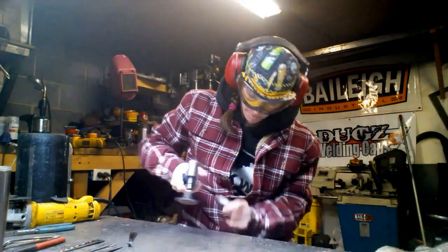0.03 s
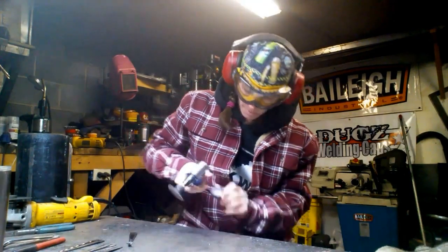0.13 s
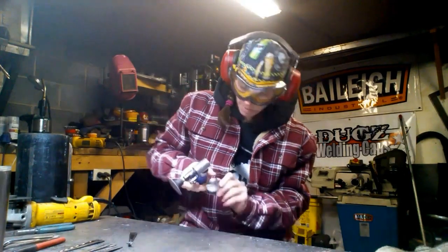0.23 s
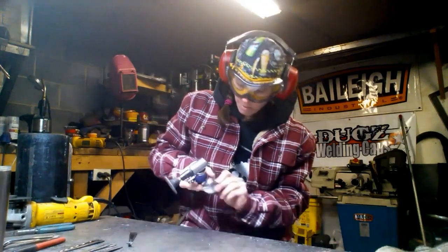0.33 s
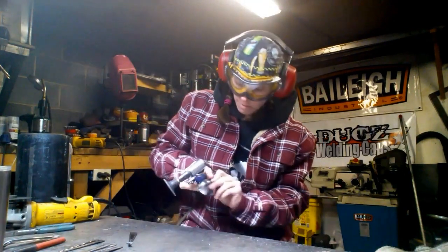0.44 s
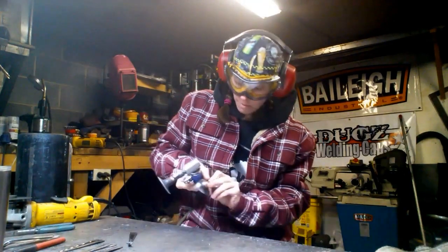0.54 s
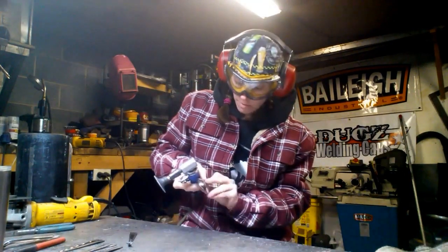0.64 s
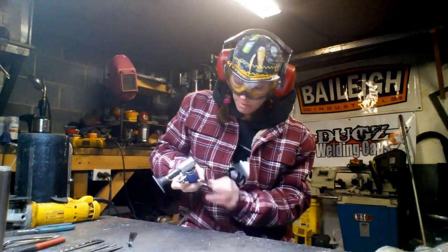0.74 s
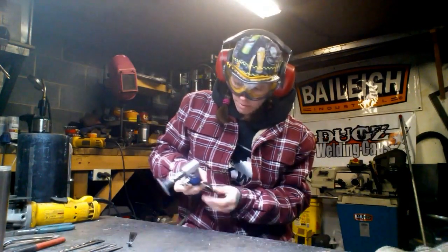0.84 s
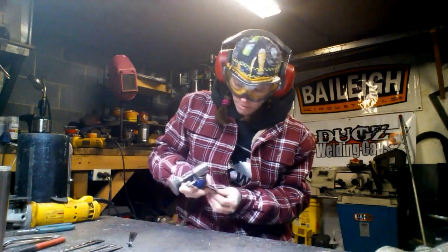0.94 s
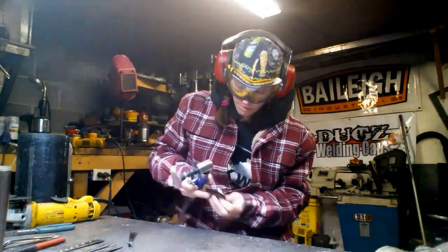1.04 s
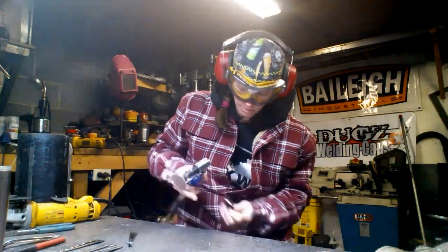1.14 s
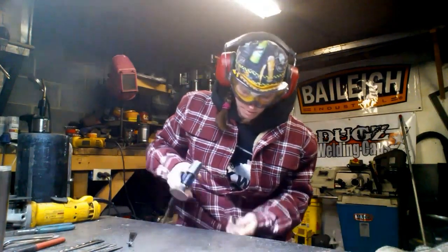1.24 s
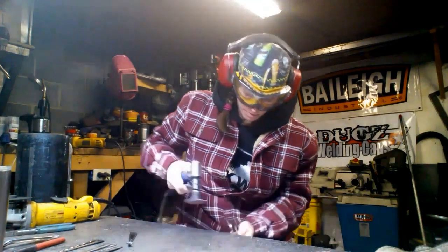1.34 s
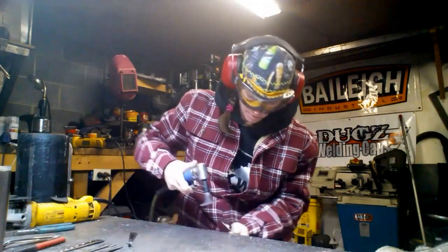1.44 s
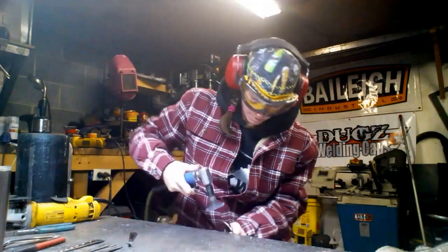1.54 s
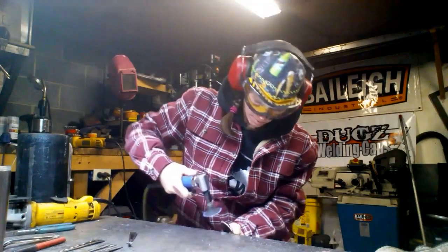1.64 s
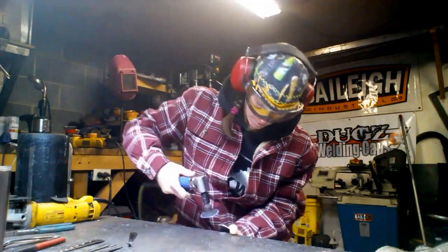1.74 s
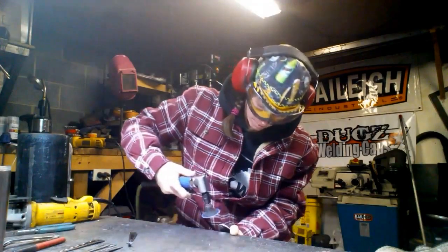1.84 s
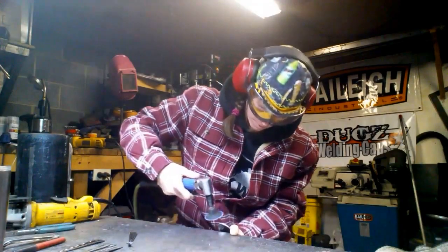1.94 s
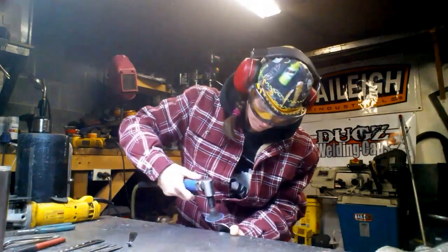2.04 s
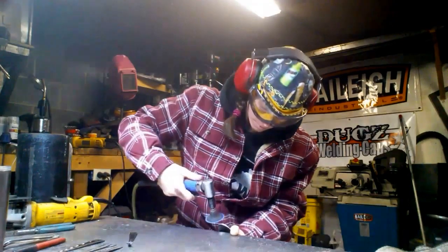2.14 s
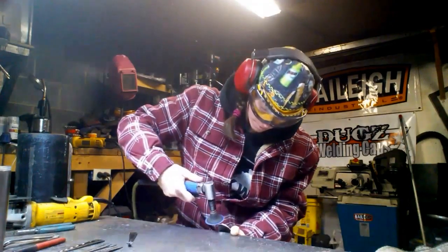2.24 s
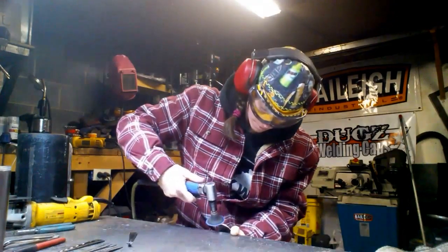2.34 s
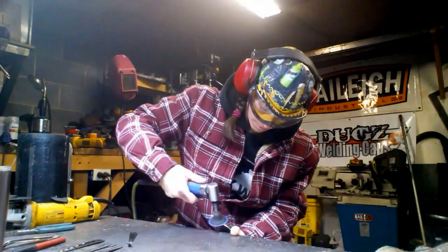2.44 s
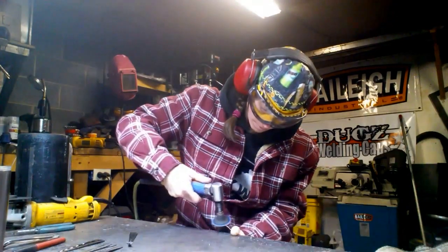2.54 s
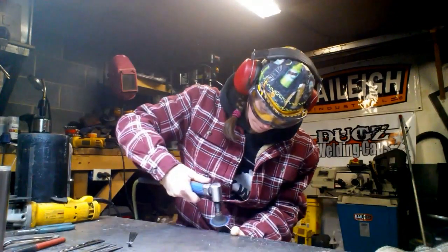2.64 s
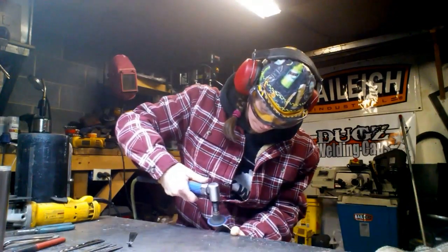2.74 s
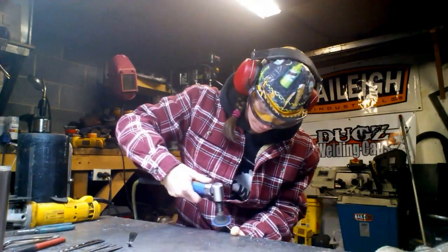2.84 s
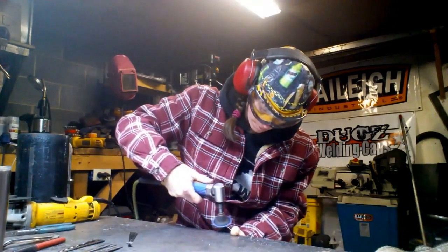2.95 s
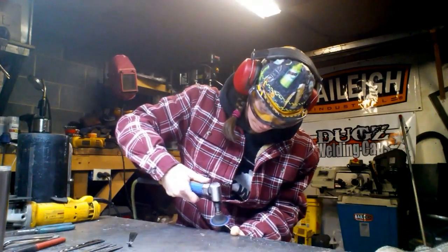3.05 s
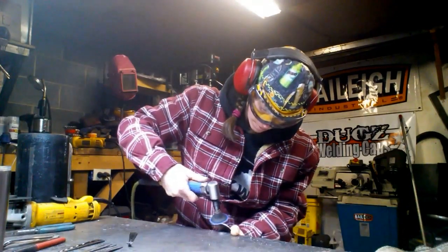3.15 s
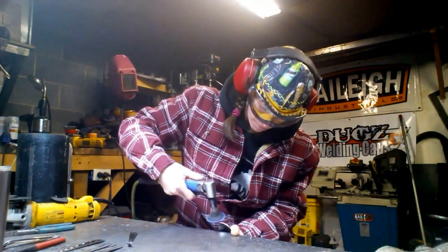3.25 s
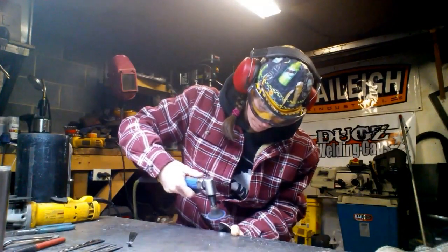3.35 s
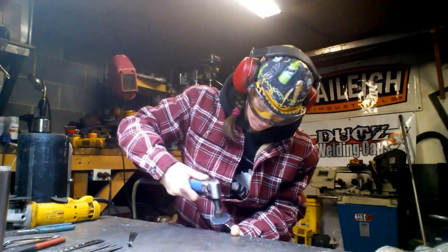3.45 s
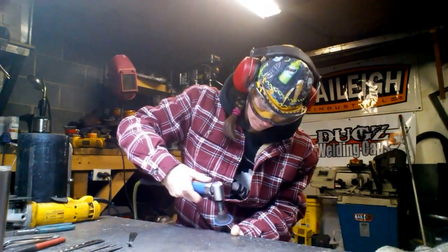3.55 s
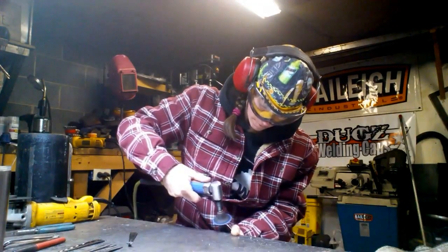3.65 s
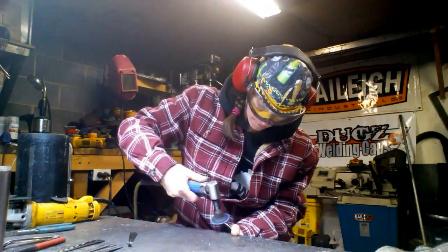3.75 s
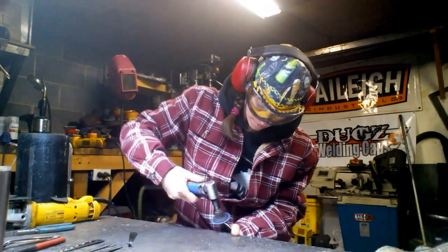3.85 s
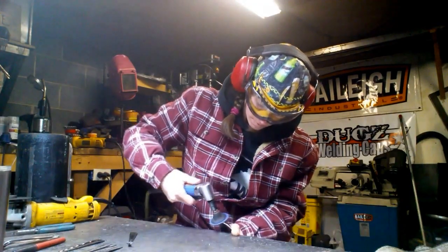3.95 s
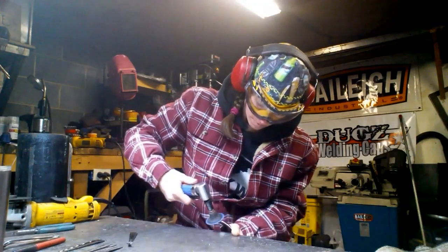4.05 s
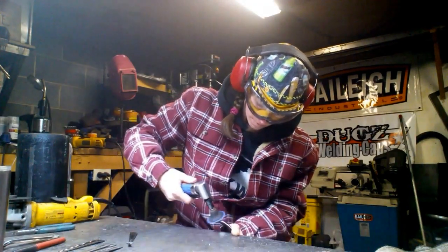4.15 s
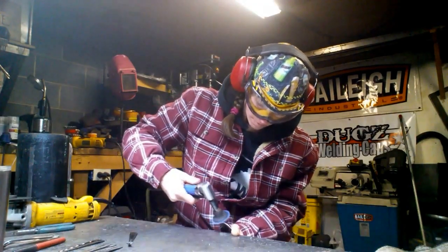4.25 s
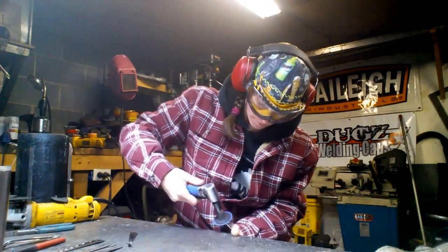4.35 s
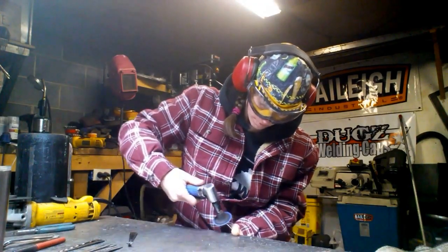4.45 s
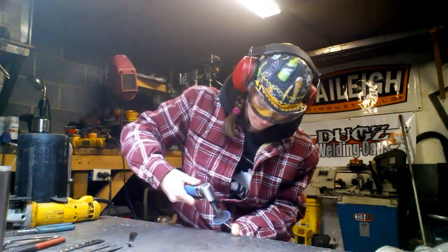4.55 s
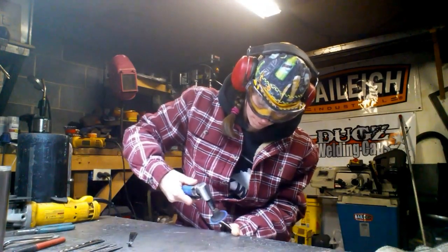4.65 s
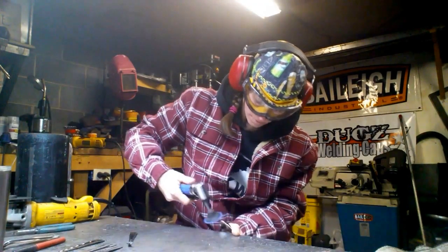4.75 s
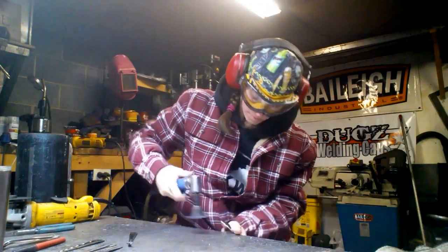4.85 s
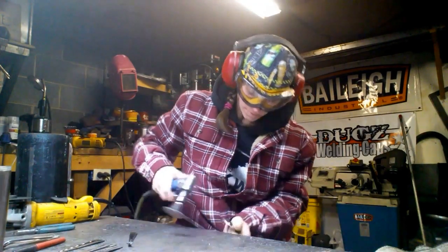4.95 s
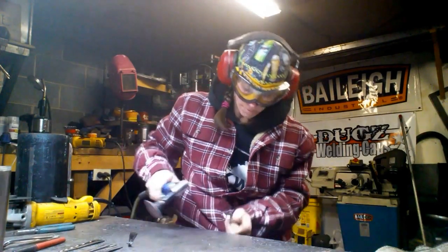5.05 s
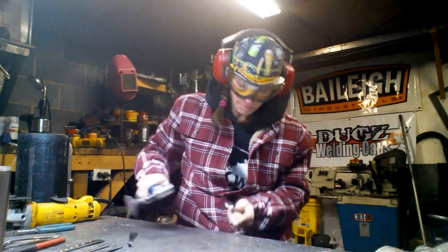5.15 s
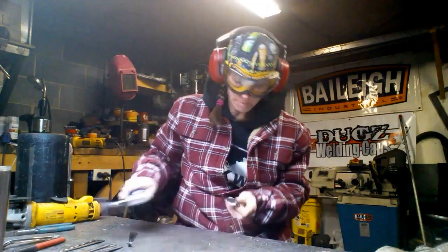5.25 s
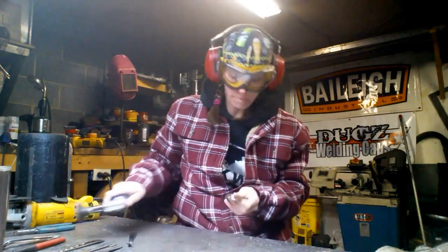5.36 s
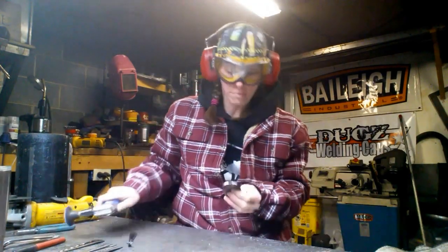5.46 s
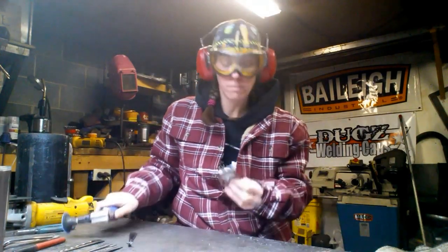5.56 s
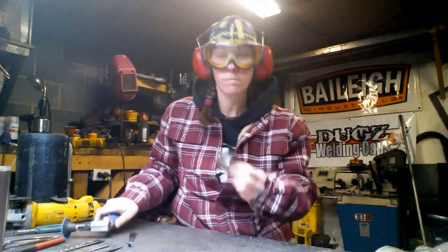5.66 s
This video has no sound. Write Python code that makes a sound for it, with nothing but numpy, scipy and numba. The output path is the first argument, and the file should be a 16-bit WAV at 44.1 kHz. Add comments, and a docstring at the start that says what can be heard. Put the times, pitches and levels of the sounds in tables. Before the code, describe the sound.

An air-powered grinder is running at the start, a piercing whine around 1.4 kHz under loud bright exhaust hiss. At about 0.08 s the air shuts off; the hiss collapses and the vane whine glides down into a low, fading purr over roughly a second. Shop hum with a thin steady high tone remains, swelling about 1 s as the microphone gain creeps up. Near 1.86-1.95 s the piece knocks the steel bench in three rapid taps, the second strongest, the last faint and bright. At 2.2 s a small air puff leads into a quick spin-up and a long burst: dense hiss, whine, gritty scratching and patchy low rumble. Dull bumps cluster at 2.8-3.1 and 3.4-3.7 s; pitch sags around 3.4 s, then jumps up and wavers. At 4.92-4.97 s the air closes and the rotor whirrs down toward the end, with short hard-walled echoes and hum.

```python
"""An air grinder with a sanding disc in a workshop: a short burst runs down, the piece knocks on the steel
bench in three quick taps, then a long burst sands it and runs down. Vanes whine at multiples of their rate;
exhaust hiss, grit scratch and a patchy low rumble are filtered noise, and dull bumps mark the disc catching.
The shop hums behind as steady tones over noise. The direct sound stands above the wall echoes.
A mono microphone with gain control turns the quiet shop up a while after each burst."""
import sys
import numpy as np
from scipy import signal
from scipy.fft import rfft, irfft
from scipy.io import wavfile
from scipy.ndimage import uniform_filter1d, map_coordinates
from numba import njit

SR = 44100
rng = np.random.default_rng(int(sys.argv[2]) if len(sys.argv) > 2 else 0)


def transcribe(signal):
    """Save signal, clipped to [-1, 1], as a 16-bit WAV file at the path in sys.argv[1]."""
    frames = np.atleast_2d(signal).T
    limited = np.clip(frames, -1, 1)
    pcm = np.round(limited * 32767).astype(np.int16)
    wavfile.write(sys.argv[1], SR, pcm)


def convert_level_to_amplitude(level_db):
    """Map a level in decibels to its linear amplitude factor."""
    exponent = np.asarray(level_db, float) / 20
    return 10 ** exponent


N = 252252  # samples
# Source levels below are those ahead of the microphone's gain control.


def at_hz(table, hz):
    """Reads a (frequency [Hz], value) table on a log-frequency axis."""
    f, v = np.transpose(table)
    return np.interp(np.log(hz + 1), np.log(f), v)


def colour(x, table):
    """Filters by a (frequency [Hz], gain [dB]) table and scales to rms 1."""
    gain = convert_level_to_amplitude(at_hz(table, np.fft.rfftfreq(len(x), 1 / SR)))
    y = irfft(rfft(x) * gain, len(x))
    return y / np.sqrt(np.mean(y ** 2))


def walk(rate):
    """Random levels held 1 / rate s and slewed twice; spread near 1."""
    k = int(SR / rate)
    held = np.repeat(rng.standard_normal(N // k + 1), k)
    return 1.2 * uniform_filter1d(uniform_filter1d(held, k), k)[:N]


def flicker(table, depth_db, rate, peaks=()):
    """Noise in half-octave bands, each wandering in level on its own, the low ones most."""
    hz = np.fft.rfftfreq(N, 1 / SR)
    spectrum = rfft(colour(rng.standard_normal(N), table))
    # each resonance takes a little off the whole to make up for its lift
    lift_db = sum(db * np.exp(-(2 * (hz - f) / w) ** 2) - db * w / 9000 for f, w, db in peaks)
    spectrum *= convert_level_to_amplitude(lift_db)
    band = np.floor(2 * np.log2(hz + 1))
    out = np.zeros(N)
    for k in range(8, 29):
        wander_db = depth_db * (1 - 0.036 * k) * walk(rate)
        out += irfft(spectrum * (band == k), N) * convert_level_to_amplitude(wander_db)
    return out


# Tones of the shop machinery at the microphone: (frequency [Hz], usual rms level [dB])
HUM_TONES = [(120, -64), (199, -80.5), (249.3, -67), (498.6, -67), (548.5, -73.5), (647.5, -75.5),
             (727.3, -78.5), (847.6, -83.5), (1235, -83.5), (1394, -79), (1744.2, -60.5), (1975, -81.5),
             (2590, -81.5), (3230, -81)]
# Broadband floor of the shop: (frequency [Hz], relative level per Hz [dB])
SHOP_FLOOR = [(18, -52), (30, -7), (65, -14), (115, -1.5), (198, -3.5), (250, 2.5), (388, -8.5),
              (503, -8.5), (557, -9.5), (1570, -16), (1740, -12), (2140, -20), (2600, -11), (2950, -18),
              (3300, -14), (3700, -20), (5870, -25), (8500, -25), (10500, -36), (14500, -67)]
SHOP_DB = -61  # level of the floor


def shop():
    """Steady tones of shop machinery over a wandering broadband floor; the low tones waver most."""
    t = np.arange(N) / SR
    tones = np.zeros(N)
    for hz, db in HUM_TONES:
        level = convert_level_to_amplitude(db + 25 / np.sqrt(hz) * walk(13))
        drift = 5 / np.sqrt(hz) * walk(5.97)  # rad
        tones += np.sqrt(2) * level * np.sin(2 * np.pi * hz * t + drift)
    return tones + convert_level_to_amplitude(SHOP_DB) * flicker(SHOP_FLOOR, 1.75, 11)


# Echo decay between the block walls: (frequency [Hz], time to fall 60 dB [s])
WALL_DECAY = [(200, 0.29), (1000, 0.45), (4000, 0.62), (14000, 0.28)]
SWAY_S, SWAY_PER_S = .0004, 3.0  # the tool sways in the hand, shifting its echoes


def room(x):
    """Dense echoes of block walls: noise decaying octave by octave at its own rate, slowest around 4 kHz."""
    t = np.arange(SR) / SR
    spectrum = rfft(rng.standard_normal(SR))
    octave = np.floor(np.log2(np.arange(len(spectrum)) + 1))
    tail = np.zeros(SR)
    for k in range(6, 15):
        t60 = at_hz(WALL_DECAY, 1.6 * 2 ** k)
        tail += irfft(spectrum * (octave == k), SR) * np.exp(-np.log(1000) * t / t60)
    tail *= np.minimum(t / 0.0028, 1)
    swayed = np.arange(N) + SWAY_S * SR * walk(SWAY_PER_S)
    x = map_coordinates(x, [swayed], mode="nearest")
    return signal.fftconvolve(x, tail / np.sqrt(np.sum(tail ** 2)))[:N]


# Knocks on the bench: (time [s], level [dB], brightness [dB per octave about 3 kHz])
KNOCKS_ON_BENCH = [(1.861, -44, -1.5), (1.897, -34.5, 0), (1.951, -60, 9)]
# Ringing modes of the bench plate: (frequency [Hz], relative level [dB], time to fall 60 dB [s])
BENCH_MODES = [(927, -6.5, 0.12), (1206, -6, 0.13), (1807, -13, 0.13), (5030, -5, 0.052), (5070, -23, 0.13),
               (5600, -18, 0.13), (6000, -18, 0.085), (6019, -16, 0.046), (6900, -19, 0.11),
               (7913, -12, 0.13), (8250, -8, 0.13), (9130, -22, 0.1), (11240, -17, 0.13)]
# Rattle of the contact: (frequency [Hz], relative level per Hz [dB])
CONTACT_RATTLE = [(290, -43), (500, -21), (898, -12), (2320, -3.5), (4530, -7.5), (4920, -4), (8240, -9.5),
                  (12000, -20), (14000, -28)]


def knocks():
    """The piece meets the bench: a short noise rattle and the decaying modes of the plate."""
    out, t = np.zeros(N), np.arange(int(SR / 2)) / SR
    for s, db, tilt_db in KNOCKS_ON_BENCH:
        tilted = [(hz, d + tilt_db * np.log2(hz / 3000)) for hz, d in CONTACT_RATTLE]
        rattle = 0.58 * colour(rng.standard_normal(len(t)), tilted)
        hit = rattle * np.exp(-t / 0.013) * np.minimum(t / 0.00075, 1)
        for hz, d, t60 in BENCH_MODES:
            level = convert_level_to_amplitude(d - 12 + tilt_db * np.log2(hz / 3000))
            hit += level * np.exp(-np.log(1000) * t / t60) * np.sin(2 * np.pi * hz * t)
        out[int(s * SR):][:len(t)] += convert_level_to_amplitude(db) * hit
    return out


# Dull bumps while sanding: (time [s], level of the push [dB])
DISC_BUMPS = [(2.783, -28), (2.82, -32), (2.899, -22.5), (3.02, -30), (3.049, -25), (3.079, -30),
              (3.418, -31), (3.484, -25.5), (3.537, -43), (3.664, -24.5)]
BUMP_HZ = 200


def bumps():
    """The disc catches: a quick low push, a slower sag and a short rasp of grit."""
    out, t = np.zeros(N), np.arange(int(SR / 10)) / SR
    rasp_table = [(100, 6), (600, -4), (2000, -2.5), (5000, -20)]  # (frequency [Hz], level per Hz [dB])
    for s, db in DISC_BUMPS:
        push = np.exp(-t * BUMP_HZ * 2.34) * np.cos(2 * np.pi * BUMP_HZ * t)
        sag = .3 * np.exp(-t / .012) * np.sin(2 * np.pi * 75.0 * t)
        rasp = 0.32 * colour(rng.standard_normal(len(t)), rasp_table) * np.exp(-t / 0.021)
        out[int(s * SR):][:len(t)] += convert_level_to_amplitude(db) * (push + sag + rasp)
    return out


# Low rumble bed under the burst: (frequency [Hz], relative level per Hz [dB])
RUMBLE_BED = [(70, -38), (140, -6), (250, -1.5), (400, -3.5), (550, 2), (750, -4.5), (1000, 0.5),
              (1500, -4.5), (2200, -29)]


def low_rumble():
    """A low, uneven rumble bed: third-octave bands of noise, each patchy in level on its own."""
    spectrum = rfft(colour(rng.standard_normal(N), RUMBLE_BED))
    band = np.floor(3 * np.log2(np.fft.rfftfreq(N, 1 / SR) + 1))
    out = np.zeros(N)
    for k in range(17, 35):
        patches = np.clip(0.72 + 0.69 * walk(21.988), .03, 2)
        out += irfft(spectrum * (band == k), N) * patches
    return out


# The hand leaning on the disc: (time [s], vane rate [Hz], scratch level re exhaust before trims [dB])
HAND_LOAD = [(0, 1390, -15), (.062, 1470, -14), (.082, 1370, -17), (2.3, 1392, -15), (2.6, 1382, -16.5),
             (2.71, 1312, -13.5), (2.83, 1355, -10.5), (2.96, 1308, -15), (3.1, 1318, -11),
             (3.2, 1306, -8.5), (3.3, 1259, -11), (3.41, 1222, -16), (3.5, 1430, -15), (3.6, 1464, -15),
             (3.76, 1452, -15), (3.93, 1350, -13.5), (4.12, 1341, -13.5), (4.25, 1310, -14.5),
             (4.35, 1418, -17), (4.5, 1400, -15), (4.63, 1413, -14.5), (4.73, 1398, -14), (4.87, 1278, -15),
             (4.945, 1240, -17), (4.97, 1160, -16)]


def load():
    """Vane rate and scratch level under the hand; the rotor's inertia rounds the corners of the rate."""
    s, hz, db = np.transpose(HAND_LOAD)
    t = np.arange(N) / SR
    return uniform_filter1d(np.interp(t, s, hz), size=1200), np.interp(t, s, db)


# Trigger pulls, also followed by coasting() and flow():
# (valve opens [s], starts closing [s], shut [s], vane rate when shut [Hz])
TRIGGER_PULLS = [(-1, .072, .081, 1335), (2.222, 4.92, 4.971, 1140)]
SPIN_LAG_S, SPIN_UP_S = .019, .086  # air torque against drag that grows with speed squared
# whine before its orders: level at free speed, rise per Hz below it, ceiling
WHINE_DB, WHINE_DB_PER_HZ, WHINE_TOP_DB, FREE_HZ = -50, .047, -40, 1460
WHINE_CLOSING_DB = 18  # lost while the valve closes


def driven():
    """While air turns the rotor: vane rate and a whine level that rises as the load drags it below free speed."""
    t, rate, level = np.arange(N) / SR, np.zeros(N), np.full(N, -120.)
    loaded_hz = load()[0]
    for opens, closing, shut, _ in TRIGGER_PULLS:
        on = (t > opens + SPIN_LAG_S) & (t < shut)
        hz = loaded_hz * np.tanh((t - opens - SPIN_LAG_S) / SPIN_UP_S)
        db = np.minimum(WHINE_DB + WHINE_DB_PER_HZ * (FREE_HZ - hz), WHINE_TOP_DB)
        db += 20 * np.log10(np.clip(hz / 650, .01, 1))  # weak until the rotor is up to 650 Hz
        db -= WHINE_CLOSING_DB * np.clip((t - closing) / (shut - closing), 0, 1) ** 2
        rate, level = np.where(on, hz, rate), np.where(on, db, level)
    return rate, level


# Pumping of the vanes while coasting: (vane rate [Hz], level before muffler and orders [dB])
COAST_PUMPING = [(80, -63), (140, -48), (205, -43.5), (288, -37), (393, -35.5), (510, -35), (641, -28.5),
                 (773, -32), (930, -27), (1300, -27)]
PUMP_LAG_S, PUMP_RISE_S, BRAKE_LAG_S = .003, .003, .008  # trapped air first cushions the rotor
DRAG_PER_S, DRAG_POWER = 10.4, 3.6  # share of speed lost a second at 1 kHz, less when slower


def coasting():
    """After the valve shuts, drag slows the rotor; the vanes' pumping fades overall, with a dip near 770 Hz."""
    t, rate, level = np.arange(N) / SR, np.zeros(N), np.full(N, -120.)
    for _, _, shut, shut_hz in TRIGGER_PULLS:
        drag = DRAG_PER_S * (shut_hz / 1000) ** (1 / DRAG_POWER) / DRAG_POWER
        after = np.maximum(t - shut, 0)
        braked_s = after - BRAKE_LAG_S * (1 - np.exp(-after / BRAKE_LAG_S))
        hz = shut_hz * (1 + drag * braked_s) ** -DRAG_POWER
        on = (t > shut) & (hz > COAST_PUMPING[0][0])
        rise_db = -30 * np.exp(-np.maximum(after - PUMP_LAG_S, 0) / PUMP_RISE_S)
        rate = np.where(on, hz, rate)
        level = np.where(on, at_hz(COAST_PUMPING, hz) + rise_db, level)
    return rate, level


def vanes(motion, orders, body, rough_db):
    """Each vane passing the port puffs air: multiples of the vane rate, coloured by body; returns the phase too."""
    hz, db = motion
    phase = 2 * np.pi * np.cumsum(hz * (1 + 0.0016 * walk(90))) / SR
    whine = np.zeros(N)
    for k, order_db in orders:
        level = convert_level_to_amplitude(order_db + at_hz(body, k * hz) + rough_db * walk(50))
        whine += level * np.sin(round(k) * phase + k)
    return np.sqrt(2) * whine * convert_level_to_amplitude(uniform_filter1d(db, size=150)), phase


# Strength of the whine's orders under air: (multiple of the vane rate, relative level [dB])
AIR_ORDERS = [(1, 3), (2, -25), (3, -21), (4, -11)]
# The same while coasting: (multiple of the vane rate, relative level [dB])
RUNDOWN_ORDERS = [(1, 0), (2, -9), (3, -12), (4, -15), (5, -17), (6, -19), (7, -21), (8, -23)]
# Muffler the coasting vanes pump through: (frequency [Hz], gain [dB])
MUFFLER_GAIN = [(100, -20), (300, -15.5), (500, -3.5), (650, 4), (850, 0), (1200, -1), (1700, -8.5),
                (2500, -3), (2800, -20), (8000, -40)]


def rotor():
    """The vane whine under air and in the run-down; returns the phase of the driven vanes too."""
    powered, phase = vanes(driven(), AIR_ORDERS, [(100, 0), (9000, 0)], 2.2)
    rundown, _ = vanes(coasting(), RUNDOWN_ORDERS, MUFFLER_GAIN, 1.34)
    return powered + rundown, phase


EXHAUST_DB = -21.7  # full flow at the usual scratch
REST_HISS_DB = -69.5  # steady faint treble hiss from the exhaust between bursts
PUFF_LEAD_S, PUFF_DB, PUFF_S = .017, -47, .006  # the finger cracks the valve first
OPEN_S, FILL_DB, FILL_S = .023, 7, .06  # valve opening; flow still missing at first, and how fast it comes
CLOSING_DB, BLEED_DB_PER_S = 10, 104  # lost while closing, then as the housing empties
THIN_DB = 5  # scratch missing until the disc is up to speed
CHOKE = .16  # exhaust dB lost for each dB of scratch over the usual
USUAL_SCRATCH_DB, SPENT_SCRATCH_DB, SPENT_S = -15, -5, .03  # the spent air is duller


def flow():
    """Exhaust level through puff, opening, hold, closing and bleed, with the scratch level relative to it."""
    t, scratch_db = np.arange(N) / SR, load()[1]
    exhaust, scratch = np.full(N, convert_level_to_amplitude(REST_HISS_DB)), np.full(N, -60.)
    for opens, closing, shut, _ in TRIGGER_PULLS:
        since, after = np.maximum(t - opens, 0), np.maximum(t - shut, 0)
        choke_db = CHOKE * (scratch_db - USUAL_SCRATCH_DB) * (t < closing)
        db = EXHAUST_DB - choke_db - FILL_DB * np.exp(-since / FILL_S)
        db -= CLOSING_DB * np.clip((t - closing) / (shut - closing), 0, 1) + BLEED_DB_PER_S * after
        lead = np.maximum(t - opens + PUFF_LEAD_S, 0)
        puff = convert_level_to_amplitude(PUFF_DB) * np.e * lead / PUFF_S * np.exp(-lead / PUFF_S)
        gain = convert_level_to_amplitude(db) * (1 - np.exp(-(since / OPEN_S) ** 2)) + puff
        spent = scratch_db + (SPENT_SCRATCH_DB - scratch_db) * np.minimum(after / SPENT_S, 1)
        spent -= THIN_DB * np.exp(-since / FILL_S)
        # this pull counts only where it is louder than the hiss so far
        scratch = np.where(gain > exhaust, spent, scratch)
        exhaust = np.maximum(gain, exhaust)
    return 20 * np.log10(exhaust), scratch


# Exhaust jet: (frequency [Hz], relative level per Hz [dB])
EXHAUST_JET = [(2600, -45), (4500, -17.5), (6400, -10.5), (6800, -3.5), (9000, -1.5), (14400, -3.5)]
# Resonances of the housing on the jet: (centre [Hz], width [Hz], lift over the surroundings [dB])
HOUSING_PEAKS = [(5500, 300, 5.5), (7000, 170, 4), (8360, 560, 2), (9780, 400, 3), (10730, 300, 4.5),
                 (11500, 300, 5), (12000, 500, 2.5), (12700, 400, 5), (13650, 800, 6.5), (14400, 500, 6)]
# Grit on the work piece: (frequency [Hz], relative level per Hz [dB])
GRIT_SCRATCH = [(700, -46), (1300, -2.5), (1700, -3.5), (2400, 3), (3200, -1), (4500, 0.5), (5500, 0.5),
                (6400, -2), (8000, -5)]


def air(phase):
    """Exhaust jet puffing with the vanes, grit scratching once a turn; returns the low rumble apart."""
    exhaust_db, scratch_db = flow()
    jet = flicker(EXHAUST_JET, 1.0, 12, HOUSING_PEAKS) * (1 + 0.23 * np.cos(phase))
    grit = flicker(GRIT_SCRATCH, 3.3, 20) * (1 + 0.13 * np.cos(phase / 5))  # five vanes
    hiss = convert_level_to_amplitude(exhaust_db) * (jet + convert_level_to_amplitude(scratch_db + 0.5) * grit)
    rumble = convert_level_to_amplitude(exhaust_db + 0.64 * scratch_db - 13) * low_rumble()
    return hiss, rumble


def scene():
    """Grinder, piece and bench with their wall echoes, over the shop; the same in both channels."""
    whine, phase = rotor()
    hiss, rumble = air(phase)
    hiss = hiss + knocks()
    echoes = room(convert_level_to_amplitude(-7) * hiss + convert_level_to_amplitude(-12.5) * whine)
    mono = hiss + whine + rumble + echoes + bumps() + shop()
    return np.array([mono, mono])


@njit
def ride(want_db, attack, release, hold):
    """Gain control of the microphone: falls fast, waits hold samples, then creeps back up."""
    gain, g, waited = np.empty(len(want_db)), 0., 0.
    for i in range(len(want_db)):
        waited += 1
        if want_db[i] <= g:
            g, waited = g + attack * (want_db[i] - g), 0.
        elif waited > hold:
            g += release * (want_db[i] - g)
        gain[i] = g
    return gain


def top_cut(x):
    """Nothing passes above the cut-off."""
    return signal.sosfilt(signal.butter(12, 14570, fs=SR, output="sos"), x)


def record(dry):
    """The capsule drops the deepest bass; gain control lifts quiet passages after a wait; the top is cut."""
    dry = signal.sosfilt(signal.butter(2, 55, "high", fs=SR, output="sos"), dry)
    power = signal.lfilter([.002], [1, -.998], dry[0] ** 2, zi=[.003])[0]
    loud_db = 10 * np.log10(power + 1e-12)
    want_db = np.clip(3 * (-39 - loud_db), 0, 16.5)  # lift below -39 dB, at most 16.5 dB
    attack_s, release_s, hold_s = 0.0044, .26, .88
    gain_db = ride(want_db, 1 / (attack_s * SR), 1 / (release_s * SR), hold_s * SR)
    x = dry * convert_level_to_amplitude(gain_db)
    mix = signal.sosfilt(signal.ellip(10, .2, 80, 14550, fs=SR, output="sos"), x)
    return top_cut(mix)


dry = scene()
out = record(dry)
transcribe(out)
```